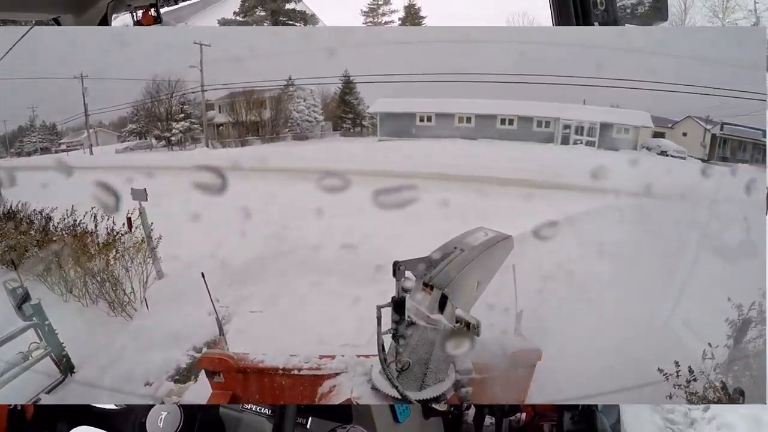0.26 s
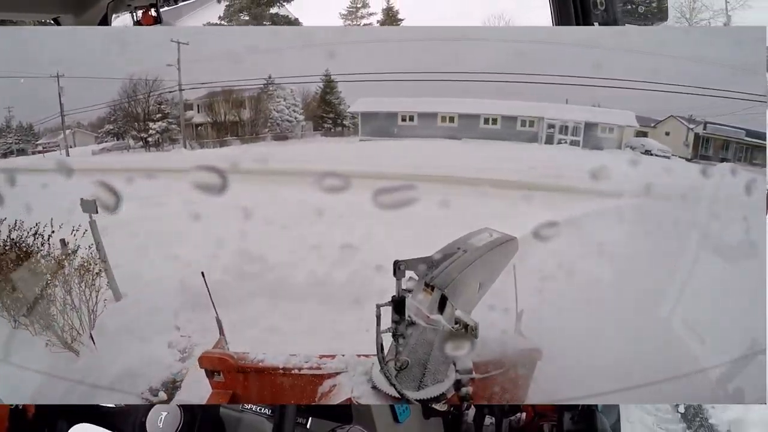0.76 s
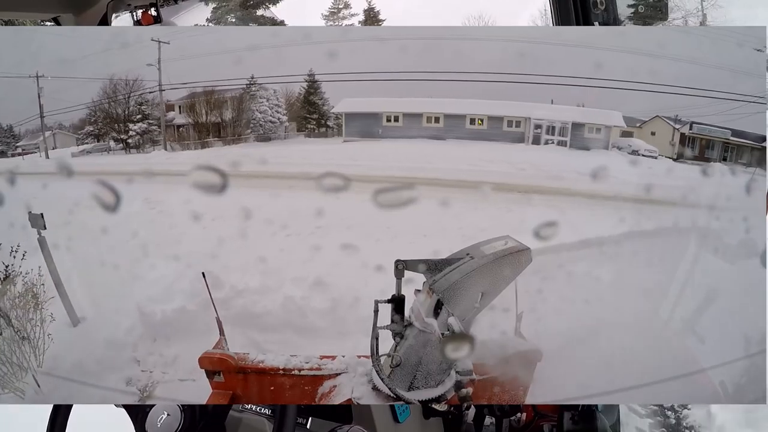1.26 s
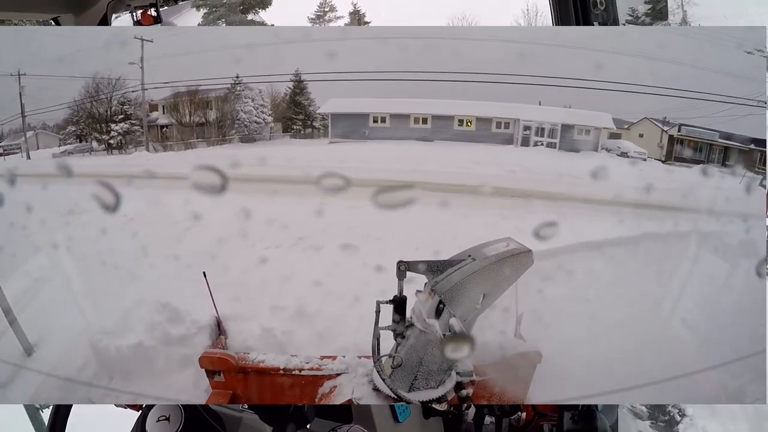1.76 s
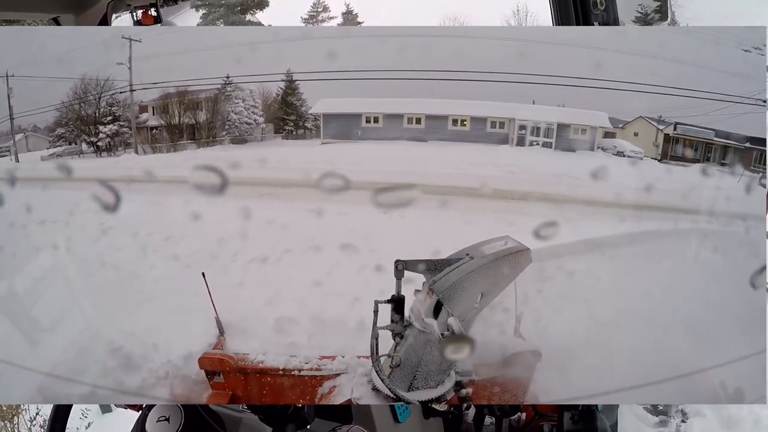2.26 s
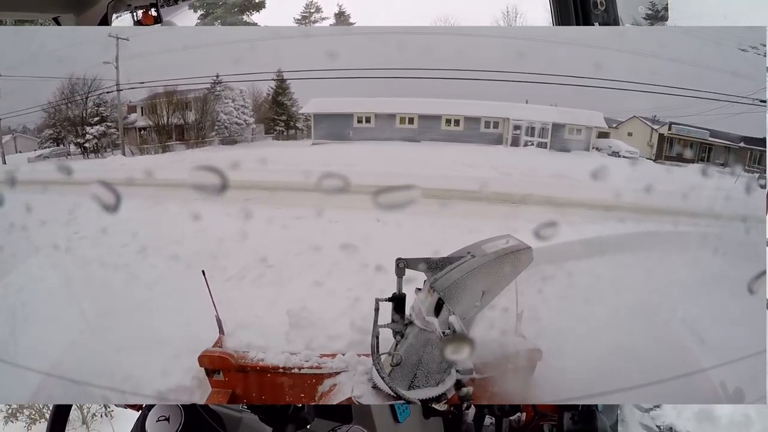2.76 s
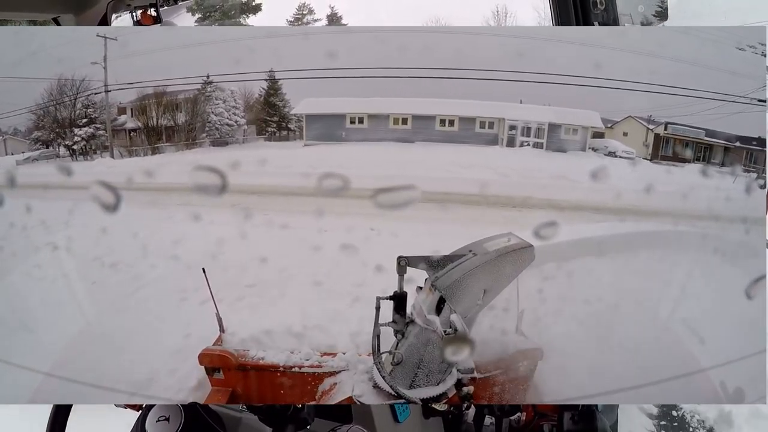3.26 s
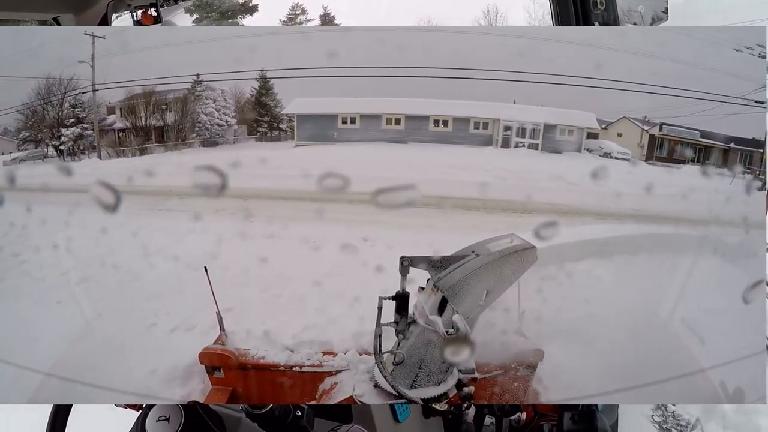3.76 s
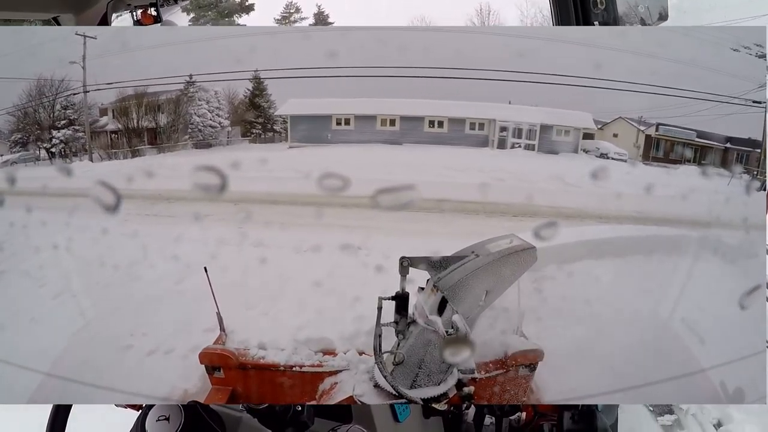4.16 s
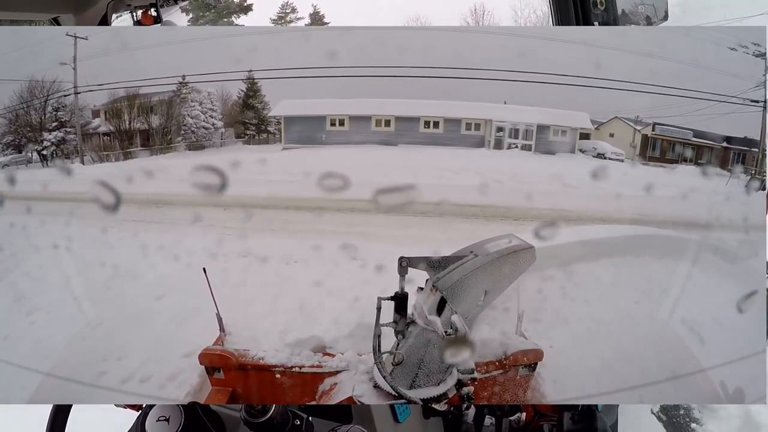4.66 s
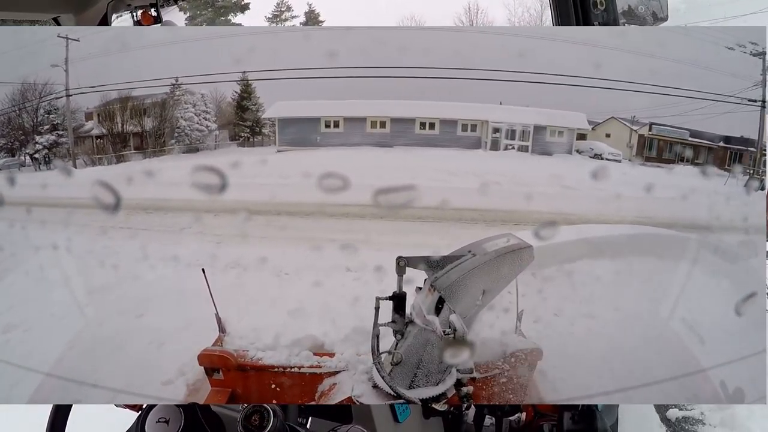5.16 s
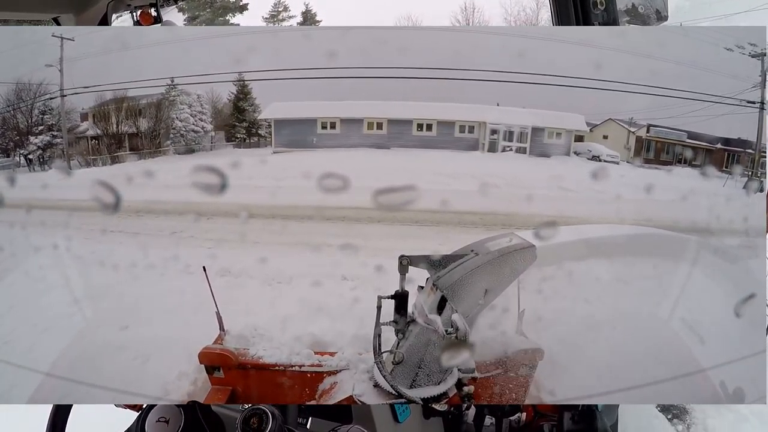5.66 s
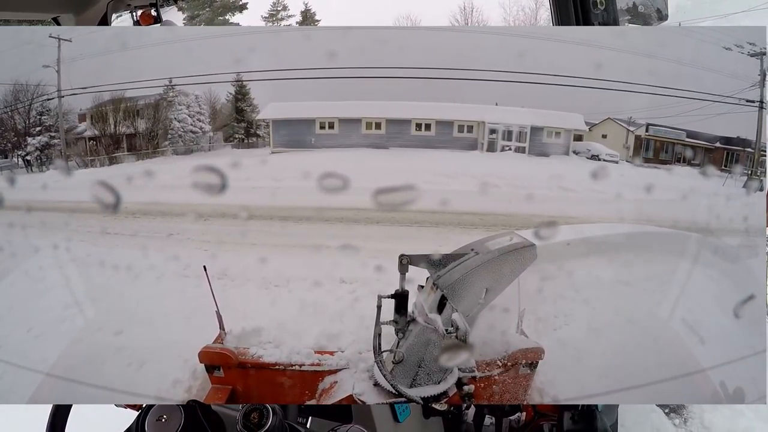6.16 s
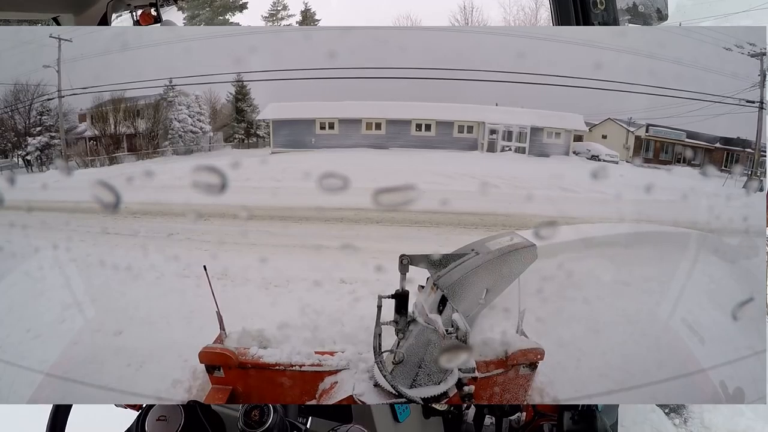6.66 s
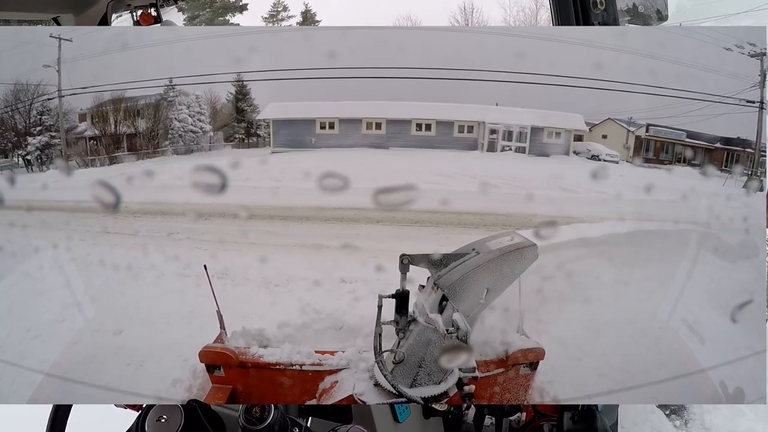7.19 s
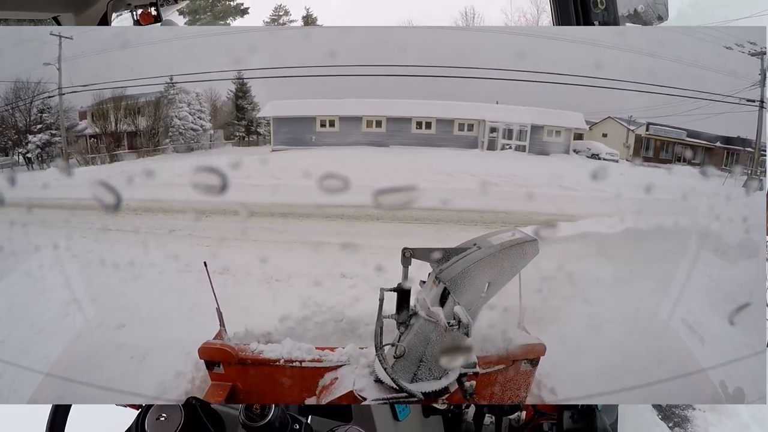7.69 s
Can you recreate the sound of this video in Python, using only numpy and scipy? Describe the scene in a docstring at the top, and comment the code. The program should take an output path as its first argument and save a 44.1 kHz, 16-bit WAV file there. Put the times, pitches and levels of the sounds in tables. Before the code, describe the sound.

From inside a tractor cab, a diesel engine drones loudly and steadily while a snowblower throbs, roars and hisses, easing off then biting into snow again.

```python
"""A three-cylinder diesel tractor, heard inside its cab as it pushes a snowblower through snow.
The engine is a sum of tones locked to its four-stroke cycle, plus knocks; geared drives whine as tones.
The impeller throbs at its blade rate; snow hiss, scrapes, clatter, noise swells and roar are shaped noise.
The blower starts full of snow, runs light for some seconds, then bites in again; levels follow its load."""
import sys
import numpy as np
from scipy import signal
from scipy.fft import rfft, irfft
from scipy.io import wavfile

SR = 44100
rng = np.random.default_rng(int(sys.argv[2]) if len(sys.argv) > 2 else 0)


def generate_wav(sig):
    """Save sig (samples, or channels by samples) to the path in sys.argv[1] as 16-bit PCM at SR."""
    pcm = np.round(np.clip(np.atleast_2d(sig).T, -1, 1) * 32767).astype(np.int16)
    wavfile.write(sys.argv[1], SR, pcm)


N = 349713
TIME = np.arange(N) / SR
BINS = np.fft.rfftfreq(N, 1 / SR)
THUD_AT = 0.29  # share of a cycle at which the thud lands


def engine(cycles, speed, load):
    """Orders of the cycle rate, locked in phase, sum to a thud; the cab's many paths smear the high ones."""
    # engine tones: order [cycle rates], light level/dB, loaded level/dB
    orders_db = [(2, -43, -36), (3, -47, -42), (4, -25, -20), (6, -39, -32), (7, -34, -28), (8, -29, -24),
                 (9, -40, -36), (10, -45, -45), (11, -57, -46), (12, -38, -36), (13, -53, -43),
                 (14, -38.5, -31), (15, -50, -42), (16, -44, -38), (17, -41, -34), (18, -39, -32),
                 (19, -41, -40), (20, -54, -48), (21, -42, -39), (22, -43, -34), (23, -45, -49),
                 (25, -54, -44), (26, -57, -44), (27, -47, -41), (29, -53, -49), (30, -60, -47),
                 (31, -50, -45), (34, -61, -46), (36, -49, -51), (37, -51, -53), (39, -61, -51),
                 (44, -58, -53), (52, -57, -53), (65, -64, -57), (78, -62, -56), (104, -63, -61),
                 (117, -62, -57)]
    thud_lag_turns = 0.2  # the cab delays every order alike
    flip_order, flip_span, flip_turns = 8.5, 0.8, 0.47  # the cab's response swings round here
    smear_order, smear_span, smear_turns = 23, 2, 0.4  # timing scatters above this order
    since_thud = cycles - THUD_AT

    # the fifth order falls behind as the load comes on, by 1 rad at full load
    boom_turns = 5 * since_thud - thud_lag_turns - load / (2 * np.pi)
    boom_db = -21 + panel_lift(5 * speed) + swell(5)
    out = -tone(boom_turns, boom_db, waver_db=0.65, slip_rad=0.3, rate_hz=8.9)

    firing_db = 0.9 * drift(rate_hz=16)  # shared by all orders but the fifth
    for order, light_db, heavy_db in orders_db:
        flip = smooth_step(order, flip_order, flip_span)
        smear = smooth_step(order, smear_order, smear_span)
        lag_turns = thud_lag_turns + cab_lag(order * speed) + flip_turns * flip
        lag_turns += smear_turns * smear * rng.standard_normal()
        # single firings differ, and that shakes the high orders most
        unrest = np.tanh(order / 16)
        db = loaded(light_db, heavy_db, load) + swell(order) + firing_db * unrest ** 2
        turns = order * since_thud - lag_turns
        out -= tone(turns, db, waver_db=1.5 * unrest, slip_rad=0.22 * unrest, rate_hz=4)
    return out


def knocks(cycles, speed, load):
    """Four uneven knocks ring the cab in each cycle: quick rise, short ring, random strength and pitch."""
    # knocks: delay after thud [cycles], mean f/Hz, light peak level/dB, loaded peak level/dB, before spread
    knock_rows = [(-.03, 380, -34, -27.5), (.05, 540, -37, -27), (.46, 470, -35, -32), (.8, 550, -38, -31)]
    rise_s, detune_log, spread_db = 0.0034, 0.1, 3
    out = np.zeros(N)
    for delay, hz, light_db, heavy_db in knock_rows:
        turns = cycles - THUD_AT - delay + 1  # +1 keeps the count positive
        which = turns.astype(int)
        age_s = turns % 1 / speed
        strength, detune, start_turns = rng.standard_normal((which[-1] + 1, 3))[which].T
        knock_hz = hz * np.exp(detune_log * detune)
        ring = np.sin(2 * np.pi * (knock_hz * age_s + start_turns))
        envelope = (age_s / rise_s * np.exp(1 - age_s / rise_s)) ** 2
        db = loaded(light_db, heavy_db, load) + spread_db * np.tanh(strength)
        out += ring * envelope * amp(db)
    return out


def drives(cycles, speed, load):
    """Gear teeth and pump pistons whine at fixed multiples of the cycle rate; backlash makes them flutter."""
    # whines near 740 Hz, 1 kHz, 2 kHz and 4 kHz: t/s, level/dB
    hum_db = [(0, -44), (.13, -44), (.36, -32.5), (.5, -45), (1.1, -48), (1.26, -36), (1.42, -38),
              (1.56, -32.5), (1.8, -45), (2.3, -56), (7.93, -54)]
    low_whine_db = [(0, -43), (.1, -40), (.35, -39.5), (.47, -53), (1.12, -51), (1.23, -38), (1.42, -44),
                    (1.8, -46), (1.95, -40.5), (2.25, -43), (2.5, -39.5), (3.3, -42.5), (4.2, -43),
                    (4.4, -46), (5.2, -46), (6.1, -54), (6.5, -49), (7.1, -49), (7.5, -58)]
    mid_whine_db = [(0, -55), (.35, -54), (.6, -63), (1.2, -58), (1.3, -44), (1.5, -44.5), (1.7, -57),
                    (3, -65), (4.2, -55.5), (4.8, -63), (5.15, -53), (6.1, -62), (6.45, -52.5), (6.85, -53),
                    (7.02, -48), (7.3, -48.5), (7.45, -43.5), (7.93, -44.5)]
    high_whine_db = [(0, -63), (.4, -63), (.8, -56), (1.15, -56.5), (1.4, -64), (2.15, -55.5), (2.3, -59),
                     (3.1, -59), (3.27, -52.5), (3.7, -62), (5.2, -66), (6, -72), (7.93, -66)]
    # further gear whines: order [cycle rates]
    whine_orders = (24.12, 72.36)
    # their levels: light level/dB, loaded level/dB, flutter [rad]
    whine_db = [(-41.5, -35, 0.24), (-63.5, -53, 0.34)]
    # hydraulic pump harmonics, first upwards: light level/dB, loaded level/dB, flutter [rad]
    pump_db = [(-52, -71, 0.19), (-52.5, -53, 0.24), (-53.5, -52, 0.74), (-57, -51.5, 0.41),
               (-64.5, -70.5, .35), (-62.5, -63, 0.49), (-66, -68, .9)]
    pump_order = 28.165  # piston strokes per cycle
    high_order = 195.0

    out = whine(35.04 * cycles, curves(hum_db)[0], flutter_rad=0.1, rough_db=1)
    out += whine(48.24 * cycles, curves(low_whine_db)[0], flutter_rad=0.15, rough_db=1)
    out += whine(96.46 * cycles, curves(mid_whine_db)[0], flutter_rad=0.25, rough_db=1.2)
    high_db = curves(high_whine_db)[0]
    out += whine(high_order * cycles, high_db, flutter_rad=0.7, rough_db=3.2)
    out += whine(2 * high_order * cycles, high_db - 7, flutter_rad=1.3, rough_db=3)  # octave

    pump_orders = [pump_order * k for k in range(1, len(pump_db) + 1)]
    orders = [*whine_orders, *pump_orders]
    levels = [*whine_db, *pump_db]
    for order, (light_db, heavy_db, flutter_rad) in zip(orders, levels):
        db = loaded(light_db, heavy_db, load) + panel_lift(order * speed) + swell(order)
        out += whine(order * cycles, db, flutter_rad, rough_db=2)
    return out


def impeller(cycles, load):
    """Each blade pushes a pulse of air; the throb turns weak and uneven when snow packs the blades."""
    # overtones: multiple of blade rate, light level/dB, loaded level/dB, both against the blade tone
    blade_overtones = [(2, -13, -9), (4, -22, -21), (5, -19, -16), (7, -27, -21), (8, -32, -27),
                       (14, -36, -29)]
    # brief drops of the throb: t/s, half-length/s, level/dB
    throb_dips = [(0.62, 0.035, -14), (6.95, 0.043, -6), (7.462, 0.5, -5.5)]
    blades_per_cycle, blade_lag_turns = 1.669, 0.15
    choke_load, choke_span = 0.33, 0.069
    choke_db, choke_waver_db = -4, 2.5

    packed = smooth_step(load, choke_load, choke_span)
    blade_db = -17.5 + packed * (choke_db + choke_waver_db * drift(rate_hz=1.1))
    blade_db = blade_db + sum(db * bump(s, length) for s, length, db in throb_dips)
    turns = blades_per_cycle * (cycles - THUD_AT) - blade_lag_turns
    out = tone(turns, blade_db, waver_db=0.5, slip_rad=0.08, rate_hz=5.5)
    for multiple, light_db, heavy_db in blade_overtones:
        db = blade_db + loaded(light_db, heavy_db, load)
        out += tone(multiple * turns, db, waver_db=2.5, slip_rad=0.54, rate_hz=1.6)
    return out


def spray(load):
    """Snow hiss as shaped noise, with a shrill narrow ring near 8 kHz; both flicker and follow the load."""
    # hiss spectrum, shape only: f/Hz, relative level/dB per Hz
    hiss_shape = [(1500, -23), (3300, -2.5), (4900, 2.5), (5500, -4), (6350, 4), (7100, -7), (7600, -2.5),
                  (8300, -8), (9000, -12), (11000, -10), (12300, -39), (15000, -43)]
    # shrill resonances: f/Hz, half-width/Hz, relative level/dB
    shrill_bands = [(7810, 55, -2), (8020, 140, 0)]
    hiss = unit(shaped(rng.standard_normal(N), spectrum(*np.transpose(hiss_shape))))
    hiss = hiss * amp(1.9 * drift(rate_hz=17))
    shrill = unit(sum(amp(db) * band(hz, width) for hz, width, db in shrill_bands))
    shrill = shrill * amp(1.2 * drift(rate_hz=20))
    return hiss * amp(loaded(-57.5, -49.5, load)) + shrill * amp(loaded(-62, -58.5, load))


def scrapes():
    """Packed snow sticks and slips on the steel housing and rings its modes: rough narrow-band noise."""
    # scrapes: t/s, half-length/s, level/dB
    scrape_rows = [(.605, .028, -38), (.675, .028, -37.5), (.75, .02, -40), (.785, .018, -36)]
    # housing modes: f/Hz, half-width/Hz, relative level/dB
    scrape_modes = [(1370, 50, -4), (1455, 50, 0), (1540, 60, -7)]
    ring = unit(sum(amp(db) * band(hz, width) for hz, width, db in scrape_modes))
    ring = unit(ring * amp(1.5 * drift(rate_hz=60)))
    return ring * sum(amp(db) * bump(s, length) for s, length, db in scrape_rows)


def clatter():
    """Frozen chunks strike the housing: each a sudden noise burst that dies fast."""
    # strikes: t/s, f/Hz, level/dB ahead of the envelope
    strikes = [(7.709, 3100, -32), (7.716, 2100, -28), (7.722, 1300, -29), (7.764, 2000, -33),
               (7.773, 950, -27), (7.788, 2500, -33), (7.796, 1000, -30)]
    rise_s, decay_s = 0.0007, 0.009
    out = np.zeros(N)
    for s, hz, db in strikes:
        age_s = np.maximum(TIME - s, 0)
        envelope = np.exp(-age_s / decay_s) - np.exp(-age_s / rise_s)
        out += amp(db) * band(hz, 0.35 * hz) * envelope
    return out


def noise_swells():
    """Swells of band noise, from brief puffs to slow rises over a second."""
    # swells: t/s, half-length/s, f/Hz, half-width/Hz, level/dB
    noise_rows = [(0.422, 0.035, 10500, 1400, -51), (0.42, 0.035, 6500, 3100, -53),
                  (1.14, 0.018, 10200, 1600, -55), (.45, .7, 790, 120, -39), (7.05, 0.34, 6400, 730, -55.5),
                  (7.45, 0.45, 10640, 860, -60), (7.25, .5, 1420, 200, -46), (7.775, 0.032, 640, 190, -30),
                  (7.78, 0.06, 34.7, 19, -18)]
    return sum(amp(db) * band(hz, width) * bump(s, length) for s, length, hz, width, db in noise_rows)


def roar(load):
    """Combustion and churned snow: gusty noise whose spectrum moves between running light and loaded."""
    # spectrum ahead of the trim: f/Hz, light level/dB per Hz, loaded level/dB per Hz
    roar_spectra = [(10, -61, -60), (22, -43, -52), (42.8, -37.5, -49), (58, -49, -45.5), (86, -48, -52),
                    (171.6, -50.5, -44), (230, -63.5, -60), (240, -55.5, -49), (350, -60, -51),
                    (450, -61, -59.5), (510, -60, -57.5), (600, -65, -61), (934, -63, -58),
                    (926, -68.5, -62), (1560, -73.5, -69.5), (2220, -76.5, -72.5), (2920, -77, -73),
                    (3610, -90.5, -88), (6500, -112, -108)]
    trim_db = -1.57
    hz, light_db, heavy_db = np.transpose(roar_spectra)
    gusty = unit(rng.standard_normal(N) * amp(0.5 * drift(rate_hz=6.2)))
    noise = gusty * np.sqrt(SR / 2)  # unit power per Hz
    light = shaped(noise, spectrum(hz, light_db))
    heavy = shaped(noise, spectrum(hz, heavy_db))
    share = 2 ** load - 1  # the roar grows by ratio with the load
    return amp(trim_db) * ((1 - share) * light + share * heavy)


def whine(turns, db, flutter_rad, rough_db):
    """A gear or pump tone: it wavers slowly, and backlash makes it flutter fast."""
    flutter_hz = 45
    flutter_turns = flutter_rad * drift(flutter_hz) / (2 * np.pi)
    rough = rough_db * drift(flutter_hz)
    return tone(turns + flutter_turns, db + rough, waver_db=1.2, slip_rad=0.4, rate_hz=7)


def tone(turns, db, waver_db, slip_rad, rate_hz):
    """One partial of a rotating part, rms level in dB; its strength and timing waver."""
    gain = np.sqrt(2) * amp(db + waver_db * drift(rate_hz))
    return gain * np.cos(2 * np.pi * turns + slip_rad * drift(rate_hz))


def panel_lift(hz):
    """Decibels that narrow cab resonances add to a tone of this pitch."""
    # resonances: f/Hz, half-width/Hz
    panels = [(106, 1.1), (738, 4), (2041, 19), (2931, 12), (4045, 22)]
    # lift at each centre: level/dB
    panel_db = (4.4, 10.5, 10.9, 2.8, 8.8)
    return sum(db / (1 + ((hz - centre) / width) ** 2) for (centre, width), db in zip(panels, panel_db))


def cab_lag(hz):
    """Turns of lag at this pitch: each cab mode adds up to one turn across its frequency, spreading the thud."""
    # cab modes: f/Hz, half-width/Hz
    cab_modes = [(208, 30), (283, 14), (323, 10), (448, 12)]
    return sum(smooth_step(hz, centre, width) for centre, width in cab_modes)


def swell(order):
    """Decibels by which the tone at this order briefly swells or sinks in the cab."""
    # swells: nearest whole order, t/s, half-length/s, extra level/dB
    swell_rows = [(5, .9, .25, -3), (5, 1.95, .3, 3), (5, 3.5, .3, 2.5), (5, 6.5, .25, -5),
                  (8, .75, .35, 3), (8, 7.6, .7, -3), (12, 2, .7, 5), (12, 6.4, .5, 4), (14, .9, .6, 4),
                  (14, 2.55, .25, 5), (14, 6.2, .4, 4), (14, 7.5, .5, -3), (24, .85, .35, 5),
                  (22, 6.65, .45, 6.5), (26, 7.3, .45, 5), (25, 7.4, .3, 4), (27, 6.7, .7, 4),
                  (65, 7.3, .5, 4), (78, 7.3, .5, 3), (19, 1, 1, 4), (19, 7.2, .8, -4), (21, 7.2, .9, -9),
                  (30, 7.3, .6, 6), (56, 2.42, .14, 7), (56, 3.08, .16, 6), (56, 4.55, .6, 5.5),
                  (113, 5, 1.3, 7), (113, 6.65, .22, -10), (197, 6.1, .7, -6), (141, 6.65, .35, 14)]
    return sum(extra_db * bump(s, length) for k, s, length, extra_db in swell_rows if k == round(order))


def loaded(light_db, heavy_db, load):
    """A level that moves with the load, from running light (0) to full of snow (1)."""
    return light_db + (heavy_db - light_db) * load


def bump(s, length):
    """A smooth rise and fall, 1 at its middle and 1/e at one length either side."""
    return np.exp(-((TIME - s) / length) ** 2)


def smooth_step(x, centre, span):
    """Rises from 0 to 1 around the centre."""
    return (1 + np.tanh((x - centre) / span)) / 2


def amp(db):
    """Decibels to gain."""
    return 10 ** (np.asarray(db) / 20)


def unit(x):
    """Scales to an rms of 1."""
    return x / np.sqrt(np.mean(x ** 2) + 1e-20)


def curves(rows):
    """The columns of a table, joined by straight lines in time."""
    s, *columns = np.transpose(rows)
    return [np.interp(TIME, s, column) for column in columns]


def spectrum(hz, db):
    """Gain at every bin, from points on a log-frequency axis."""
    return amp(np.interp(np.log(BINS + 1), np.log(hz), db))


def shaped(x, gain):
    """Filters by a gain at every bin."""
    return irfft(rfft(x) * gain, N)


def band(hz, width_hz):
    """Noise of rms 1 in a bell-shaped band."""
    return unit(shaped(rng.standard_normal(N), np.exp(-((BINS - hz) / width_hz) ** 2)))


def drift(rate_hz):
    """Random drift of rms 1, moving at up to about this rate."""
    knots = rng.standard_normal(2048)
    hz = np.fft.rfftfreq(len(knots), TIME[-1] / len(knots))
    slow = unit(irfft(rfft(knots) * np.exp(-(hz / rate_hz) ** 2)))
    return np.interp(TIME, np.linspace(0, TIME[-1], len(slow)), slow)


def scene():
    """One crankshaft turns everything; the blower's load sets how hard it sounds."""
    # engine speed ahead of the hunting: t/s, four-stroke cycle rate f/Hz
    speed_rows = [(0.0, 21.0), (0.3, 21.1), (.43, 21.06), (0.56, 20.79), (1.1, 20.8), (1.42, 21.19),
                  (2.45, 20.661), (3.4, 20.7), (4.65, 20.509), (6.15, 20.705), (6.42, 20.78), (6.6, 20.935),
                  (6.92, 20.935), (7.15, 21.225), (7.93, 21.177)]
    # blower load, as loudness of its roar: t/s, level/dB
    load_rows = [(0.0, -22), (0.8, -20.5), (1.4, -23), (2.4, -26.0), (3.1, -28.5), (3.45, -28), (4.7, -33),
                 (6.05, -32), (6.75, -24.5), (7.6, -21), (7.93, -23.5)]
    light_db, heavy_db = -29.5, -20.5  # running light, full of snow
    hunt_hz, hunt_crest_s, hunt_depth_hz = 2.56, 2.58, 0.05

    load = np.clip((curves(load_rows)[0] - light_db) / (heavy_db - light_db), -0.3, 1.4)
    # the governor hunts while the blower runs light
    hunting = bump(3.7, 1.9) * np.cos(2 * np.pi * hunt_hz * (TIME - hunt_crest_s))
    speed = curves(speed_rows)[0] + hunt_depth_hz * hunting
    cycles = np.cumsum(speed) / SR

    tractor = engine(cycles, speed, load) + knocks(cycles, speed, load) + drives(cycles, speed, load)
    blower = impeller(cycles, load) + spray(load) + scrapes() + clatter()
    return (tractor + blower + noise_swells() + roar(load))[None]


def record(dry):
    """Fades both ends over 4 ms, then low-passes at 15.2 kHz."""
    fade = np.clip(np.minimum(TIME, TIME[-1] - TIME) / 0.004, 0, 1)
    lowpass = signal.firwin(511, 15200, window=("kaiser", 9), fs=SR)
    return signal.oaconvolve(dry * fade, lowpass[None], "same")


dry = scene()
out = record(dry)
generate_wav(out)
```